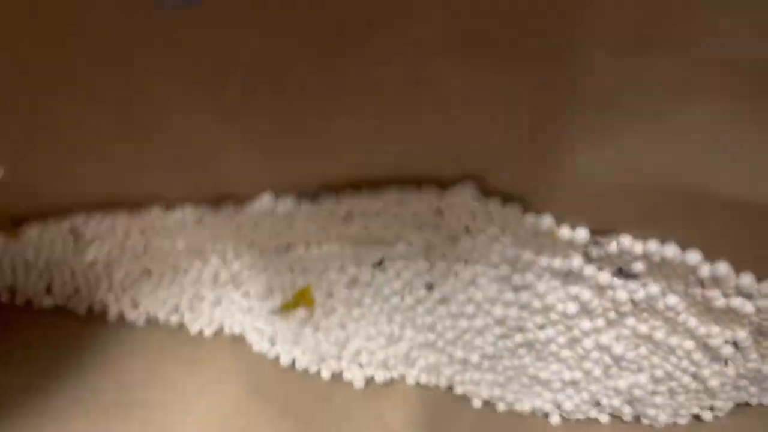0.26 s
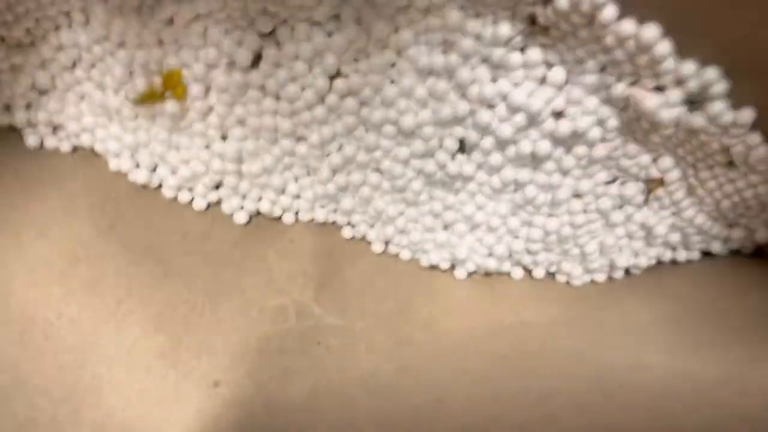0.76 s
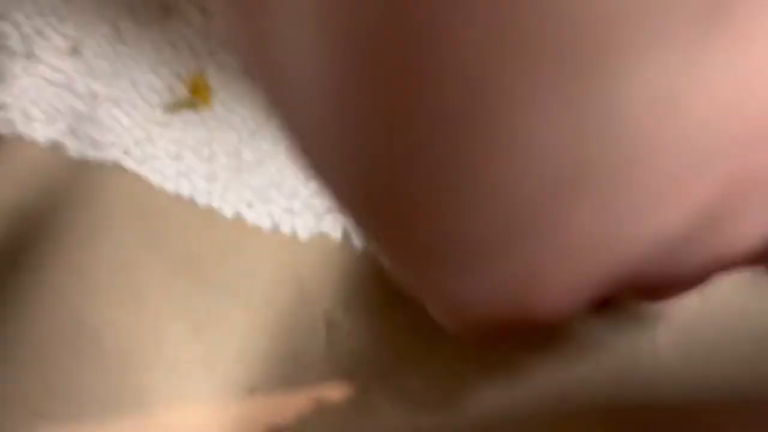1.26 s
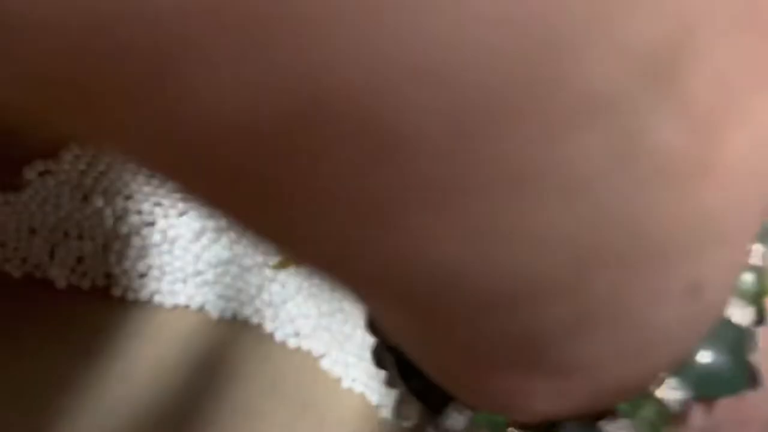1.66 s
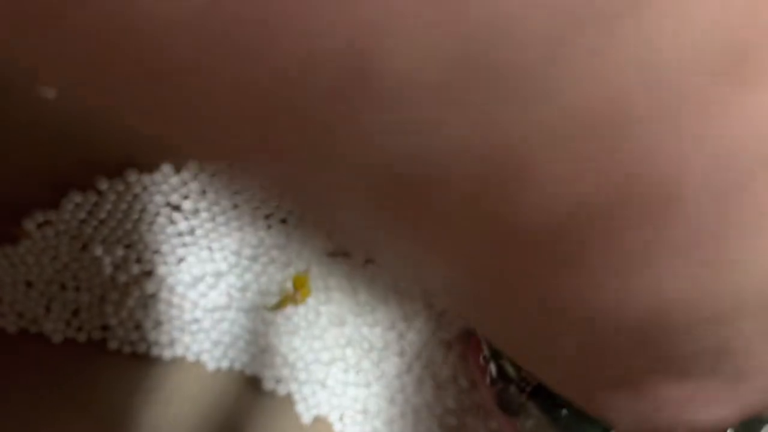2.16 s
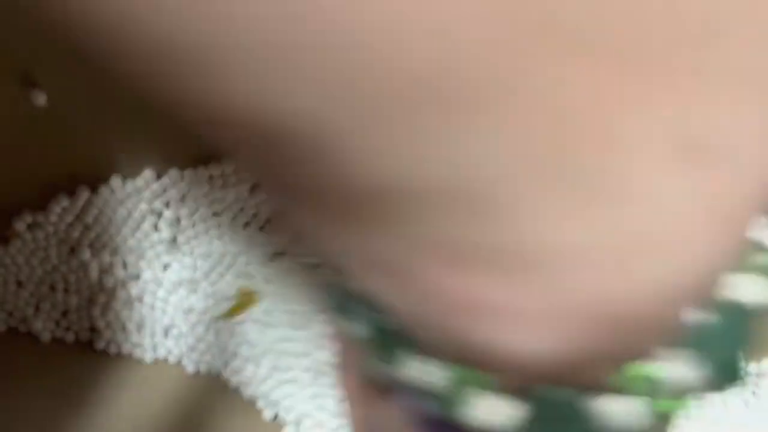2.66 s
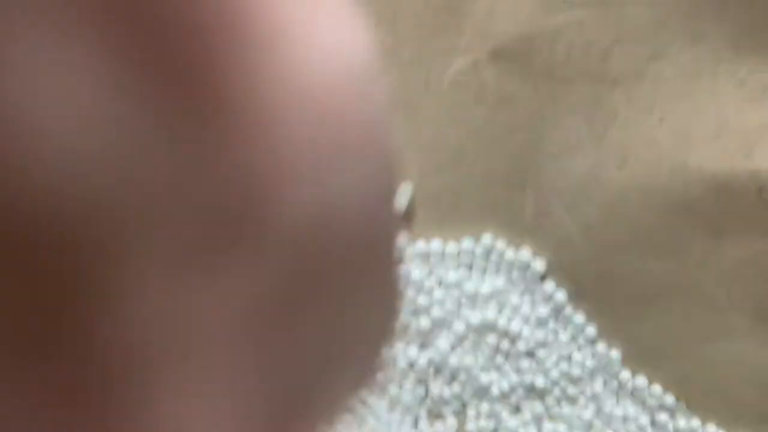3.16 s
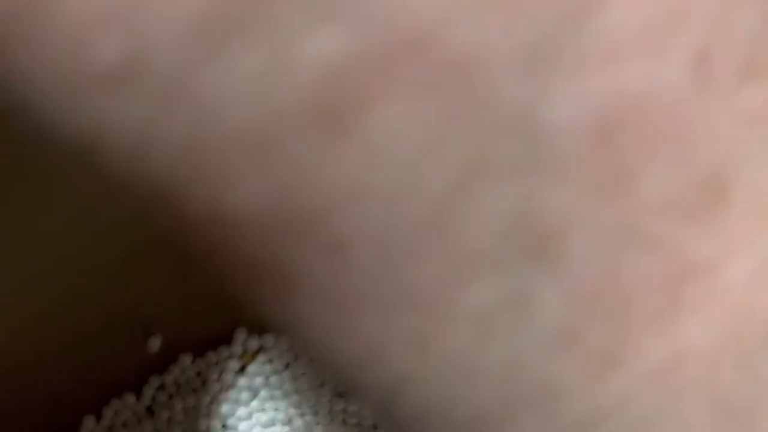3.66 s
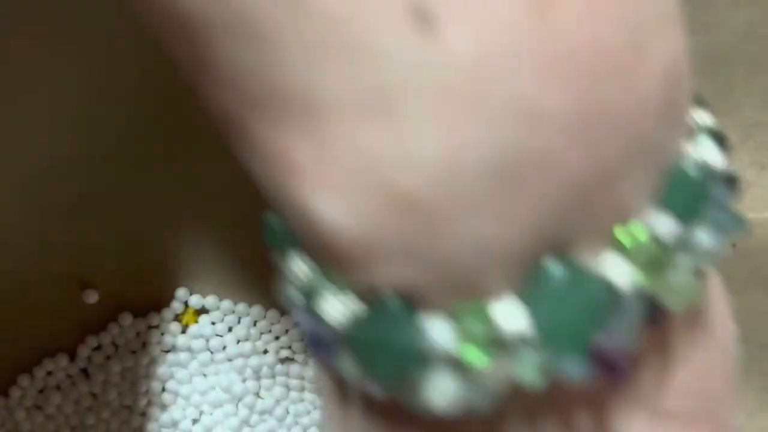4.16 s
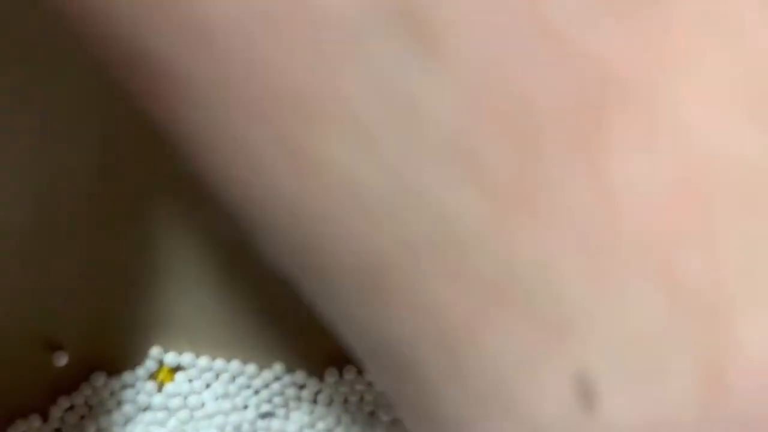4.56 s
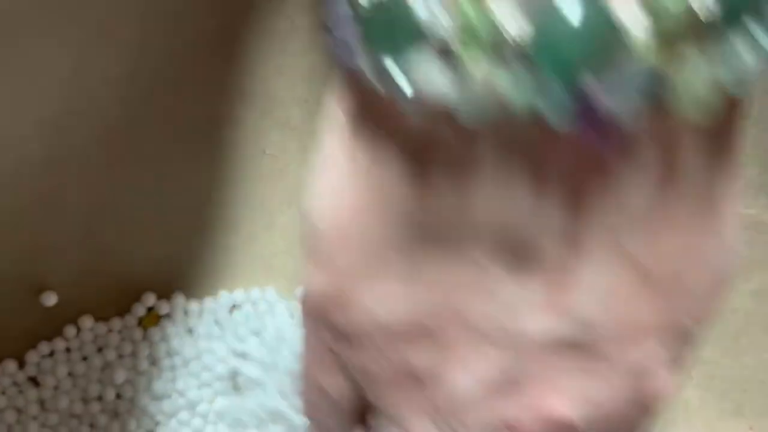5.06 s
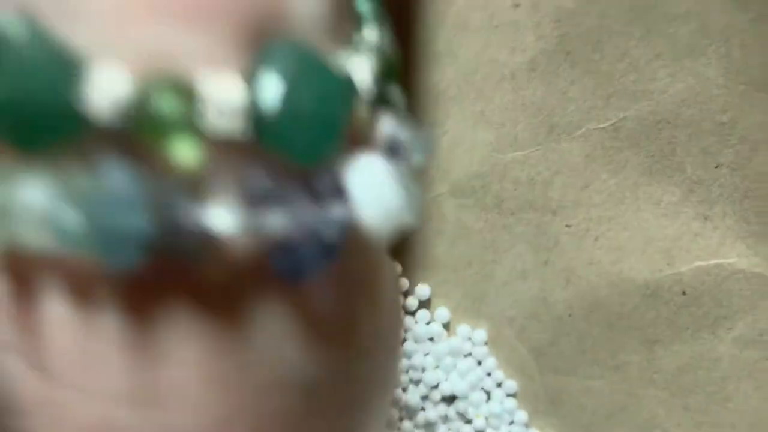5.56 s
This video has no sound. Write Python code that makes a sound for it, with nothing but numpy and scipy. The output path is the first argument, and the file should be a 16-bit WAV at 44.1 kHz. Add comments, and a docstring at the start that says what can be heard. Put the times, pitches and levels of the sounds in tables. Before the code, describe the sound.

Fingers stir lightweight foam beads, which fizz, crackle and squeak briefly, while the cardboard underneath scrapes and its walls thud. Activity thickens from one to three seconds, pauses, returns suddenly around three and a half, dips again near four and a half, surges, and ends in smaller, gritty movements. The microphone is close, the sound dry and wide.

```python
"""A hand digs through loose foam beads in a cardboard box, heard close up in stereo.
Stirring and single strokes are shaped noise: fingers scrape the card, beads fizz and the walls boom.
Knuckle knocks and palm thumps ring the box as fading tones.
Ticks are tiny gritty rings, crunches are sudden bursts of noise, and squeaks are short sliding tones."""
import sys
import numpy as np
from scipy import signal
from scipy.fft import rfft, irfft, next_fast_len
from scipy.io import wavfile
from scipy.ndimage import uniform_filter1d

SR = 44100
rng = np.random.default_rng(int(sys.argv[2]) if len(sys.argv) > 2 else 0)


def transcribe(u):
    """Save the signal u as a 16-bit wav file named by the first command-line argument.

    u: samples, shape (n,) or (channels, n), limited to [-1, 1]; the rate is SR.
    q: integer samples, one column per channel.
    """
    v = np.clip(np.atleast_2d(u).T, -1, 1)
    q = np.round(v * 32767).astype(np.int16)
    wavfile.write(sys.argv[1], SR, q)


N = 255780  # length in samples


def gain_of(db):
    """Turns decibels into a factor."""
    return 10 ** (np.asarray(db) / 20)


def evened(x):
    """Scales a sound to an average strength (rms) of 1."""
    return x / np.sqrt(np.mean(x ** 2) + 1e-20)


def read_spectrum(points, hz):
    """Reads values between the points, on a log-frequency axis."""
    point_hz, value = np.transpose(points)
    return np.interp(np.log(hz + 1), np.log(point_hz + 1), value)


def follow(table):
    """Draws each column of a timed table as a curve with a value at every sample."""
    s, *columns = np.transpose(table)
    return [np.interp(np.arange(N) / SR, s, c) for c in columns]


def add(mix, s, sound):
    """Mixes a sound in at time s."""
    part = mix[:, round(s * SR):][:, :sound.shape[-1]]
    part += sound[..., :part.shape[1]]


def grains(per_s, spread_db, grain_s, bed):
    """Random slips of unequal size: each is a short dying puff of noise, over a steady bed."""
    slips = rng.random(N) < per_s / SR
    size = gain_of(spread_db * np.minimum(rng.exponential(1, N), 4)) * slips
    fade = np.exp(-1 / (grain_s * SR))
    power = signal.lfilter([1], [1, -fade], size ** 2)
    # two unrelated noises share the same puffs
    return np.sqrt(power / power.mean() + bed) * rng.standard_normal((2, N))


def coloured(x, colour, patchy_db, size, streaky_db=3.5):
    """Shapes the spectrum, with drifting patches for the ever-changing contact and narrow lasting
    streaks drawn at random, so the noise is unevenly tinted."""
    overlap = size * 3 // 4
    hz, _, z = signal.stft(x, SR, nperseg=size, noverlap=overlap)
    patches = rng.standard_normal(z.shape[:0:-1]).T
    patches = uniform_filter1d(patches, size=7, axis=0)  # smooth over pitch
    patches = evened(uniform_filter1d(patches, size=12, axis=1))  # smooth over time
    streaks = rng.standard_normal(z.shape[:0:-1]).T
    streaks = evened(uniform_filter1d(streaks, size=40, axis=1))
    colour_db = read_spectrum(colour, hz)[:, None]
    z = z * gain_of(colour_db + patchy_db * patches + streaky_db * streaks)
    return evened(signal.istft(z, SR, nperseg=size, noverlap=overlap)[1][:, :N])


ATTACK_DB_PER_S, RELEASE_DB_PER_S = 1300, 388  # how fast a stroke rises and falls away
# single strokes of the fingers: t/s (of full strength), hold/s, scrape level/dB,
# drag on the card over the scrape/dB, bead fizz over the scrape/dB, shove on the walls/dB
FINGER_STROKES = [(0.266, 0.011, -41, 5, 2.5, -27.5), (0.354, 0.044, -43, 7, 7, -28.5),
                  (0.565, 0.018, -41, 3, 2, -46), (0.666, 0.033, -53, 15, 1, -49),
                  (0.878, 0.085, -41.5, 3.5, 5, -30), (1.017, 0.058, -46.5, 13, -3, -23.5),
                  (1.196, 0.093, -50, -6, 17.5, -39), (1.352, 0.12, -32.5, 2, 4, -24.5),
                  (1.498, 0.038, -26.5, 4.5, 7, -18.5), (1.626, 0.075, -37, 1.5, 4.5, -26),
                  (1.74, 0.013, -35.5, -15, -1, -49), (1.899, 0.0038, -34, -1, 9.5, -22),
                  (1.944, 0.072, -31, 3.5, 5.5, -23), (2.101, 0.041, -34.5, 0, 4.5, -38),
                  (2.17, 0.063, -29, 1, 9, -24.5), (2.398, 0.057, -30.5, 10.5, 5.5, -40),
                  (2.555, 0.065, -29, 5.5, 8, -30), (2.686, 0.028, -33.5, 8, -16, -28),
                  (2.766, 0.052, -24.5, -1.5, 4.5, -19.5), (2.968, 0.11, -42, 3, 6, -31.5),
                  (3.35, 0.047, -53.5, -4, 6.5, -58), (3.522, 0.073, -33.5, 6, 9, -33),
                  (3.71, 0.01, -41, -8, 14, -34), (3.961, 0.008, -44.5, -11, 12, -25.5),
                  (4.129, 0.11, -39, 2.5, 9.5, -38), (4.607, 0.014, -39.5, 10, -12, -24),
                  (4.881, 0.075, -36.5, -17, -3, -30.5), (5.04, 0.024, -27.5, -20, 5, -24),
                  (5.132, 0.064, -29, -1.5, 7, -30), (5.595, 0.039, -33, 1, 10, -27.5),
                  (5.698, 0.021, -41, -4, 5.5, -35), (5.749, 0.016, -32, -10, 1, -26.5)]


def stroked(stir_db, stroke_db, lag_s, release_db_per_s):
    """Level in dB: the power of each stroke rises, holds and falls away on top of the stirring."""
    t = np.arange(N) / SR - lag_s
    power = gain_of(2 * stir_db)
    for (start, hold, *_), db in zip(FINGER_STROKES, stroke_db):
        rise_db = ATTACK_DB_PER_S * (t - start)
        fall_db = -release_db_per_s * (t - start - hold)
        shape_db = np.clip(np.minimum(rise_db, fall_db), -90, 0)
        power = power + gain_of(2 * (db + shape_db))
    return 10 * np.log10(power)


def squeaks(per_s, spread_db, count):
    """Foam sticks and slips on foam: brief gliding chirps, each shape repeated at random moments."""
    out = np.zeros((2, N))
    for hz, (cycles, glide) in zip(np.geomspace(1100, 11500, count), rng.random((count, 2))):
        length = round((14 + 30 * cycles) * SR / hz ** .5 / 60)  # higher chirps tend to be shorter
        u = np.linspace(0, 1, length)
        turns = hz * length / SR * (u + 0.19 * (glide - .5) * u ** 2)
        chirp = np.sin(2 * np.pi * turns) * u ** 0.2 * np.exp(-3.5 * u)
        chirp = chirp / np.linalg.norm(chirp)
        size = gain_of(spread_db * np.minimum(rng.exponential(1, (2, N)), 3))
        train = size * (rng.random((2, N)) < per_s / count / SR)
        out += signal.oaconvolve(train, chirp[None], axes=1)[:, :N]
    return evened(out)


FIRM_DB = -30  # level that counts as a firm touch
STIR_DRAG_DB = 1.5  # base level of the drag over the stirring scrape
LIGHT_DRAG, LIGHT_RATTLE = 0.072, 0.023  # dB gained per dB that the touch is lighter than FIRM_DB
# the hand keeps stirring: t/s, scrape level/dB, bead fizz over the scrape/dB, boom of the walls/dB
STIRRING = [(0, -44.5, 7.5, -38), (.1, -48.5, 8.5, -42), (.23, -50.5, 5, -35), (.28, -48.5, 8, -36),
            (.42, -43, 2.5, -31.5), (.55, -45.5, 7, -31), (.68, -40.5, 2, -27.5), (.8, -42.5, 5, -26.5),
            (.85, -50, 7.5, -29), (.99, -42.5, 6.5, -29), (1.04, -35, 7.5, -26), (1.3, -38.5, 9, -29.5),
            (1.72, -40, 5, -35), (1.86, -44, 8, -31), (2.07, -41.5, 6, -38), (2.3, -46, 7.5, -41),
            (2.37, -35, -4, -23), (2.5, -37.5, 8, -29), (2.7, -33.5, 5.5, -27.5), (2.92, -44, 4.5, -31.5),
            (3.08, -51.5, 5, -35.5), (3.19, -54, 5, -43.5), (3.26, -66, 2, -39), (3.36, -61, 4, -39),
            (3.455, -45.5, 7, -40), (3.48, -30.5, 3, -21), (3.82, -40, 8, -27.5), (3.9, -44.5, 5.5, -30),
            (4.07, -35, 6, -27.5), (4.22, -36, 9, -31.5), (4.33, -57.5, 4.5, -37), (4.474, -53, 1, -35.5),
            (4.484, -34.5, 7, -20), (4.6, -34.5, 4.5, -24.5), (4.75, -39, 8, -26),
            (4.88, -37.5, 8.5, -26.5), (5.0, -33, 8.5, -28), (5.2, -38, 5.5, -32.5),
            (5.28, -44.5, -1, -31.5), (5.37, -51, 3, -30.5), (5.45, -51, 1.5, -35),
            (5.52, -52.5, -2, -35.5), (5.57, -42.5, -1, -27.5), (5.66, -53, 9, -55), (5.8, -31.5, 5, -42)]
# how flat the palm lies on the card: t/s, level/dB added to the drag and rattle of the stirring
PALM_FLATNESS = [(0, 4.5), (.4, 1), (.8, 3.5), (1.2, 3), (1.6, 3), (2, -0.5), (2.4, 1), (2.8, -1), (3.1, 5),
                 (3.4, -1), (3.8, -0.5), (4.2, 1.5), (4.55, 0), (4.9, -2), (5.3, 0), (5.8, -4)]
# colours of the drag on the card, the scrape and the bead fizz: f/Hz, level/dB (relative, per Hz)
DRAG_COLOUR = [(400, 5), (600, 6), (800, -1.5), (1000, 3.5), (1170, 4), (1450, -2), (1780, -0.5),
               (2100, -15.5), (2600, -65), (4000, -99)]
SCRAPE_COLOUR = [(1100, -39), (1900, 10), (2150, 12.5), (2450, 15.5), (2800, 14.5), (3150, 14),
                 (3700, 14.5), (4500, 6), (5500, -12), (7500, -90)]
FIZZ_COLOUR = [(2500, -45), (4500, -12), (5600, -5), (6300, -4), (7300, -3), (8300, -4.5), (9500, -4),
               (10300, -2), (10900, 0), (11400, -2.5), (12400, -13.5), (13500, -23), (14200, -33),
               (15700, -38), (17000, -60)]


def rustle():
    """The same slips sound low on the card and high in the beads."""
    stir_db, stir_fizz_db, _ = follow(STIRRING)
    level_db, drag_over_db, fizz_over_db = np.transpose(FINGER_STROKES)[2:5]
    scrape_db = stroked(stir_db, level_db, 0, RELEASE_DB_PER_S)
    fizz_db = stroked(stir_db + stir_fizz_db, level_db + fizz_over_db, 0, RELEASE_DB_PER_S)
    light_db = LIGHT_DRAG * (FIRM_DB - stir_db)
    stir_drag_db = stir_db + STIR_DRAG_DB + follow(PALM_FLATNESS)[0] + light_db
    drag_db = stroked(stir_drag_db, level_db + drag_over_db, 0, RELEASE_DB_PER_S)

    slips = evened(grains(per_s=510, spread_db=8.0, grain_s=0.015, bed=1.1))
    slips = slips + gain_of(-8) * squeaks(per_s=900, spread_db=3.2, count=28)
    bead_ticks = evened(grains(per_s=800, spread_db=4, grain_s=0.0004, bed=0.0078))
    slips += gain_of(-4) * bead_ticks
    drag = coloured(slips, DRAG_COLOUR, patchy_db=0.5, size=512)
    scrape = coloured(slips, SCRAPE_COLOUR, patchy_db=1.3, size=512)
    fizz = coloured(slips, FIZZ_COLOUR, patchy_db=1.5, size=256)
    return gain_of(scrape_db) * scrape + gain_of(drag_db) * drag + gain_of(fizz_db) * fizz


WALL_LAG_S, WALL_RELEASE_DB_PER_S = 0.024, 277  # the heavy panels boom late and fade slowly
RATTLE_DB, SHOVE_RATTLE_DB = -5.5, -3  # rattle over the boom: base while stirring, during a stroke
DEEP_HZ, DEEP_GAIN = 80, .45  # the deepest boom needs a firm push: dB gained per dB over FIRM_DB
# colours of the boom and the rattle of the panels: f/Hz, level/dB (relative, per Hz)
BOOM_COLOUR = [(18, -55), (30, -38), (45, -17), (63, 5.5), (90, -3.5), (125, 2), (170, -6.5), (260, -31.5),
               (400, -74)]
RATTLE_COLOUR = [(90, -43), (160, -10), (200, 0), (254, 0), (320, -2), (420, -8), (540, -11.5),
                 (700, -13.5), (950, -23), (1500, -78)]


def walls():
    """Uneven shoves shake the big panels, which boom and rattle."""
    stir_db = follow(STIRRING)[-1]
    shove_db = np.transpose(FINGER_STROKES)[-1]
    boom_db = stroked(stir_db, shove_db, WALL_LAG_S, WALL_RELEASE_DB_PER_S)
    light_db = LIGHT_RATTLE * (FIRM_DB - stir_db)
    stir_rattle_db = stir_db + RATTLE_DB + follow(PALM_FLATNESS)[0] + light_db
    rattle_db = stroked(stir_rattle_db, shove_db + SHOVE_RATTLE_DB, 0, RELEASE_DB_PER_S)

    shoves = grains(per_s=35, spread_db=3, grain_s=0.018, bed=.4)
    taps = grains(per_s=300, spread_db=3.5, grain_s=0.005, bed=.3)
    boom = coloured(shoves, BOOM_COLOUR, patchy_db=1.5, size=2048, streaky_db=1.5)
    rattle = coloured(taps, RATTLE_COLOUR, patchy_db=1.5, size=1024, streaky_db=2)
    deep = signal.sosfiltfilt(signal.butter(2, DEEP_HZ, fs=SR, output="sos"), boom)
    boom = boom + (gain_of(DEEP_GAIN * (boom_db - FIRM_DB)) - 1) * deep
    return gain_of(boom_db) * boom + gain_of(rattle_db) * rattle


# ringing modes of the box, before chance detunes them: f/Hz, level/dB, t60/s of free ringing
BOX_MODES = [(64, 7.5, 0.15), (85, 1, 0.18), (147.8, 2.5, 0.098), (187.5, 1, 0.11), (253.7, 3.5, 0.082),
             (307.6, 3, 0.059), (371.3, -0.4, 0.068), (485.3, 3.5, 0.041), (720, -4, 0.029),
             (987, -5.5, 0.05), (1222, -4, 0.044), (1486, -9, 0.045), (1700, 14, 0.0058),
             (2360, -17, 0.039)]
# knuckle knocks: t/s, peak level/dB, centre of the struck modes f/Hz, width/octaves,
# share of the ring time that the hand leaves (0-1)
KNUCKLE_KNOCKS = [(.3524, -2.5, 444, 0.59, 0.32), (.3585, -13, 228, 0.34, 0.24),
                  (0.566, -27, 710, 0.94, 0.3), (0.631, -27, 866, 1.3, 0.9), (1.075, -14.5, 905, 1.9, 0.74),
                  (1.2125, -17, 1290, 1.6, 0.37), (1.358, -26, 570, 0.52, 0.1),
                  (1.578, -9.5, 296, 0.28, 0.58), (1.661, -12, 230, 0.31, 0.97),
                  (1.948, -8.5, 320, 0.6, 0.9), (1.965, -10.5, 393, 0.7, 0.9),
                  (2.102, -14.5, 497, 2.6, 0.53), (2.198, -12, 1310, 3.3, 0.35),
                  (2.236, -11.5, 324, 0.21, 0.57), (2.371, -18.5, 292, 0.22, 1),
                  (2.543, -13.5, 243, 1.2, 0.46), (2.695, -26, 920, 4.6, 0.6), (3.051, -22, 444, 0.18, 1),
                  (3.2225, -14, 380, 1.18, 0.4), (3.229, -11, 212, 0.72, 0.34), (3.285, -33, 450, .8, 0.16),
                  (3.425, -15.5, 310, 1.04, 0.34), (3.4705, -3.5, 290, 0.74, 0.34),
                  (3.706, -22.5, 1500, 1, 0.44), (3.8543, 1, 820, 1.65, 0.48), (3.931, -21.5, 240, 0.24, 1),
                  (4.043, -22, 1290, 2.2, 0.66), (4.208, -16, 198, 0.41, 0.6), (4.481, -15, 328, 0.53, 0.8),
                  (4.509, -13, 420, 1.1, 0.6), (4.565, -11, 300, 1.7, 0.26), (4.638, -14, 327, 0.55, 0.2),
                  (4.673, -18.5, 300, 0.58, 0.57), (4.808, -14, 220, 0.74, 0.22),
                  (5.005, -17, 346, 0.51, 0.9), (5.042, -11.5, 277, 1.35, 0.37),
                  (5.123, -11.5, 596, 1.05, 0.7), (5.178, -15, 306, 0.74, 0.4),
                  (5.315, -24, 450, 1.5, 0.26), (5.357, -16, 343, 0.46, 0.62), (5.491, -24, 298, 1.3, 0.25),
                  (5.533, -21.5, 500, 2.3, 0.23), (5.645, -18.5, 370, 1, 0.61),
                  (5.702, -22.5, 310, 1.4, 0.5)]


def knock(db, centre_hz, octaves, ring_time, chance):
    """Box modes near the centre ring; low modes swell later, so the thud falls in pitch."""
    hz, mode_db, t60 = np.transpose(BOX_MODES)[:, :, None]
    hz = hz * (1 + chance[:, None] / 25)  # up to 4 % off
    t = np.arange(12000) / SR
    near_db = -6.5 * (np.log2(hz / centre_hz) / max(octaves, .2)) ** 2
    swell = 1 - np.exp(-(t * hz / 1.24) ** 2)
    fade = gain_of(mode_db + near_db - 60 * t / (t60 * ring_time))
    ring = (fade * swell * np.exp(2j * np.pi * hz * t)).sum(0)
    return gain_of(db) * np.array([ring.imag, ring.real]) / abs(ring.imag).max()


# thumps of the palm against the walls: t/s, peak level/dB, centre of the struck modes f/Hz,
# share of the ring time that the palm leaves (0-1)
PALM_THUMPS = [(0.362, -21, 139, .8), (0.95, -13, 59.2, 0.43), (1.015, -11, 75, 0.46), (1.07, -16, 62, 0.4),
               (1.164, -11, 64, 0.4), (1.365, -12, 101, 0.26), (1.453, -9, 79.5, 0.5),
               (1.529, -21, 75.4, 0.2), (1.612, -12, 85, 0.3), (1.969, -5.5, 80.5, 0.44),
               (2.409, -17, 59.2, 0.58), (2.618, -17, 56.5, .5), (2.841, -14.5, 56.5, 0.55),
               (3.228, -17, 142, 0.4), (3.325, -25.5, 90, 0.44), (3.428, -11.5, 101, .35),
               (3.445, -16, 66, 0.7), (3.48, -13, 61.9, 0.36), (3.853, -7.5, 91, 0.62),
               (4.364, -22.5, 89, 0.65), (4.505, -15, 70, 0.65), (4.688, -13.5, 70, 0.33),
               (5.006, -26, 70, 0.4), (5.601, -26, 129, 0.6), (5.628, -26, 110, 0.2)]


def thump(db, centre_hz, ring_time, chance):
    """The palm strikes the same box modes, in a narrow band of 0.45 octaves."""
    return knock(db, centre_hz, 0.45, ring_time, chance)


TICK_CYCLES, TICK_GRIT = 1.1, 0.71  # cycles until about a third is left; share of hiss in the snap
# single beads snapping against the card: t/s, level/dB (before rise and fade), pitch f/Hz
BEAD_TICKS = [(0.6294, -20, 1100), (0.6556, -25, 1350), (0.701, -24, 1100), (1.2132, -11, 1620),
              (1.3592, -14, 1200), (1.947, -11, 1770), (2.1038, -18, 1140), (2.391, -16, 1160),
              (3.707, -25, 1620), (3.9256, -24, 1200), (3.9654, -29, 1290), (4.0434, -20, 1120),
              (4.3, -34, 2500), (4.4814, -11.5, 1430), (5.2583, -17, 1860), (5.3118, -24, 1330),
              (5.3353, -24, 3000), (5.5338, -17, 2410), (5.5974, -18, 2360), (5.6997, -26, 1500),
              (5.7616, -17, 1850)]


def tick(db, hz, noise):
    """A cycle or two of ring with a gritty edge."""
    turns = hz * np.arange(noise.shape[1]) / SR
    ring = np.array([np.sin(2 * np.pi * turns), np.cos(2 * np.pi * turns)])
    ring = ring + TICK_GRIT * uniform_filter1d(noise, size=3)
    rise = np.minimum(4 * turns, 1)  # a quarter cycle
    return gain_of(db) * rise * np.exp(-turns / TICK_CYCLES) * ring


SNAP = 4.6  # size of the first snap, in multiples of the raw noise's rms
CRUNCH_RISE = .15  # time constant of the rise, as a share of t60
# crunches of bead clumps: t/s, rms level/dB (before rise and fade), centre f/Hz,
# t60/s (at least 0.005 is used)
BEAD_CRUNCHES = [(0.63, -13, 1590, 0.006), (0.656, -29, 3000, 0.01), (0.669, -18.5, 4940, 0.013),
                 (0.701, -12, 6500, 0.018), (1.0762, -14, 2200, 0.017), (1.2119, -12, 1410, 0.011),
                 (1.269, -11, 12100, 0.021), (1.359, -12, 1000, 0.026), (1.3652, -5.5, 1820, 0.015),
                 (1.425, -5.5, 5070, 0.022), (1.774, -9, 6760, 0.02), (1.8657, -19, 3100, .012),
                 (1.894, -12.5, 2480, 0.038), (1.907, -1, 5660, 0.01), (1.947, -12, 1750, 0.04),
                 (2.104, -12, 1500, 0.015), (2.116, -14, 2000, 0.011), (2.123, -26, 2000, .012),
                 (2.196, -8, 1950, 0.018), (2.39, -13.5, 2900, 0.056), (2.5653, -4, 1270, 0.024),
                 (2.632, -0.5, 1890, 0.018), (2.7423, -9.5, 5540, 0.024), (2.751, -3, 3700, 0.026),
                 (2.766, -5, 3730, 0.053), (2.786, -3.5, 2000, 0.033), (2.805, -3.5, 3720, 0.027),
                 (2.878, -17, 1830, 0.021), (2.907, -23, 3800, 0.012), (2.958, -17, 3770, 0.017),
                 (3.219, -24.5, 6800, 0.027), (3.213, -28.5, 3480, 0.018), (3.3065, -41, 1500, 0.012),
                 (3.3438, -43, 1270, .012), (3.4248, -22, 1740, 0.018), (3.466, -4.5, 1800, 0.036),
                 (3.529, -7, 2360, 0.017), (3.7051, -5.5, 6630, 0.015), (3.8326, -5.5, 2500, 0.039),
                 (3.8551, -10.5, 2000, 0.025), (3.9252, -27, 1300, 0.011), (3.9645, -23, 1490, 0.011),
                 (3.9913, -23, 2650, .02), (4.0447, -27, 1590, 0.022), (4.142, -17, 3530, .03),
                 (4.363, -31, 1970, 0.031), (4.4134, -38, 1400, 0.013), (4.4373, -42, 1100, .012),
                 (4.4807, -16, 2960, 0.016), (4.8564, -14, 5700, 0.017), (4.905, -14, 3400, 0.016),
                 (5.046, -2, 2880, 0.018), (5.1037, -15, 3000, 0.024), (5.132, -13, 1770, 0.035),
                 (5.141, -2, 11300, 0.0049), (5.258, -24, 1850, 0.02), (5.311, -29, 3000, .015),
                 (5.335, -24, 3400, 0.019), (5.357, -22, 1530, 0.025), (5.4156, -39, 1500, .012),
                 (5.443, -32, 2500, .01), (5.456, -28, 3000, .01), (5.485, -33, 1000, 0.018),
                 (5.5286, -25.5, 1320, 0.05), (5.597, -10, 11100, 0.019), (5.648, -22, 1500, 0.018),
                 (5.701, -25, 9000, 0.018), (5.7627, -13, 1890, 0.0087)]


def crunch(db, centre_hz, t60, noise):
    """A snap and a sudden burst of noise, part broad and part gathered round one pitch."""
    t = np.arange(noise.shape[1]) / SR
    t60 = max(t60, .005)
    noise = noise + SNAP * (np.arange(len(t)) == 50)
    edges = np.clip([centre_hz / 1.11, centre_hz * 1.19], 200, 11900)
    broad_band = signal.butter(7, [600, 11800], "bandpass", fs=SR, output="sos")
    near_band = signal.butter(2, edges, "bandpass", fs=SR, output="sos")
    broad = evened(signal.sosfilt(broad_band, noise))
    near = evened(signal.sosfilt(near_band, noise))
    shape = (1 - np.exp(-t / (CRUNCH_RISE * t60))) * gain_of(-60 * t / t60)
    return gain_of(db) * evened(1.53 * broad + near) * shape


SQUEAL_SAG = 0.018  # share of the pitch lost from start to end
# clear squeaks of foam on foam: t/s, peak level/dB, starting pitch f/Hz, length/s
FOAM_SQUEALS = [(.749, -37, 2870, .008), (1.03, -25, 10500, .008), (1.079, -20, 11300, .008),
                (1.437, -26, 4250, .008), (1.655, -27, 2985, 0.0088), (1.937, -29, 6600, .006),
                (1.953, -14, 11250, 0.0063), (2.4, -23, 6180, .008), (2.58, -28, 11100, 0.0072),
                (2.759, -19, 1120, 0.0095), (2.806, -13.5, 1820, 0.0062), (3.535, -23.5, 2490, 0.01),
                (3.835, -13, 10750, 0.0073), (3.921, -31, 2250, 0.011), (3.989, -28, 3240, .01),
                (4.169, -16, 10800, 0.011), (4.702, -40, 6780, 0.0071), (4.93, -17.5, 12000, 0.01),
                (4.966, -26, 1680, 0.0088), (5.212, -26, 1600, 0.015), (5.435, -41, 10800, .008),
                (5.479, -39, 2400, 0.01), (5.61, -33, 4300, .008)]


def squeal(db, hz, length):
    """A short soft-edged tone that sags in pitch."""
    u = np.linspace(0, 1, round(max(length, .002) * SR))
    turns = hz * len(u) / SR * (u - SQUEAL_SAG * u ** 2 / 2)
    tone = np.array([np.sin(2 * np.pi * turns), np.cos(2 * np.pi * turns)])
    return gain_of(db) * np.sin(np.pi * u ** 0.96) ** 2 * tone


def scene():
    """Row 0 is the main sound; row 1 is a companion with its own noise and quarter-turn tones,
    mixed into the right."""
    mix = rustle() + walls()
    for s, *settings in KNUCKLE_KNOCKS:
        add(mix, s, knock(*settings, rng.uniform(-1, 1, len(BOX_MODES))))
    for s, *settings in PALM_THUMPS:
        add(mix, s, thump(*settings, rng.uniform(-1, 1, len(BOX_MODES))))
    for s, *settings in BEAD_TICKS:
        add(mix, s, tick(*settings, rng.standard_normal((2, 500))))
    for s, *settings in BEAD_CRUNCHES:
        add(mix, s, crunch(*settings, rng.standard_normal((2, 4000))))
    for s, *settings in FOAM_SQUEALS:
        add(mix, s, squeal(*settings))
    return mix


EDGE_HZ = 15770  # upper band limit
# stereo likeness: f/Hz, left-right likeness (0-1)
STEREO_LIKENESS = [(60, 1), (130, .999), (300, .975), (420, .975), (600, .9), (770, .84), (900, .92),
                   (1300, .99), (1500, 1), (2000, .999), (2400, .8), (2750, .25), (2950, .62), (3400, .5),
                   (3600, .68), (4300, .55), (4650, .85), (4800, .985), (4950, .985), (5200, .72),
                   (5750, 1), (6100, .995), (6800, .83), (8000, .78), (8450, 1), (9550, 1), (10000, .88),
                   (11600, .87), (11900, .993), (13800, .993), (14400, .4), (15200, .98)]
# stereo phase: f/Hz, half turns by which the right channel is turned back
STEREO_PHASE = [(20, -.02), (120, -.02), (280, -.055), (420, -.03), (700, -.08), (820, -.01), (1080, -.06),
                (1400, 0), (2200, .02), (2700, .13), (2950, 0), (3500, .15), (4150, .33), (4500, .55),
                (4850, 1), (5200, 1.5), (5700, 2), (6150, 2), (8100, 2.8), (8450, 3), (9550, 3),
                (11600, 3.75), (11900, 4), (13900, 4), (15000, 5)]


def record(dry):
    """The right channel is the left one turned in phase and partly mixed with the companion."""
    size = next_fast_len(N + 4096)
    hz = np.fft.rfftfreq(size, 1 / SR)
    left, companion = rfft(dry, size)
    same = np.clip(read_spectrum(STEREO_LIKENESS, hz), 0, 1)
    right = same * left + np.sqrt(1 - same ** 2) * companion
    right = right * np.exp(-1j * np.pi * read_spectrum(STEREO_PHASE, hz))
    stereo = irfft(np.array([left, right]), size)[:, :N]
    stereo = .97 * np.tanh(stereo / .97)  # a soft limit rounds off the loudest peaks
    band_limit = signal.firwin(511, EDGE_HZ, window=("kaiser", 9), fs=SR)
    return signal.oaconvolve(stereo, band_limit[None], "same")


dry = scene()
out = record(dry)
transcribe(out)
```